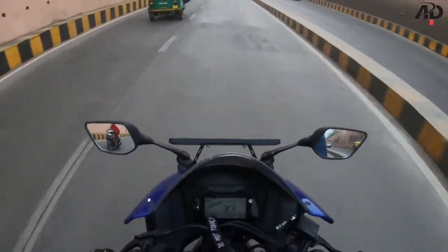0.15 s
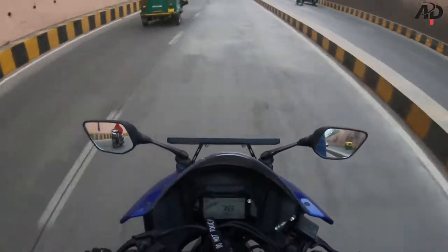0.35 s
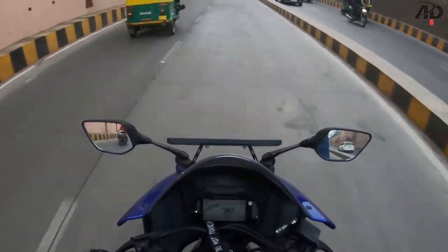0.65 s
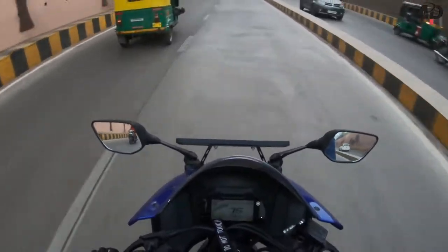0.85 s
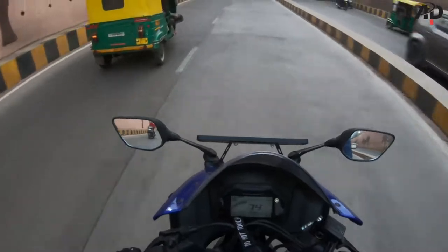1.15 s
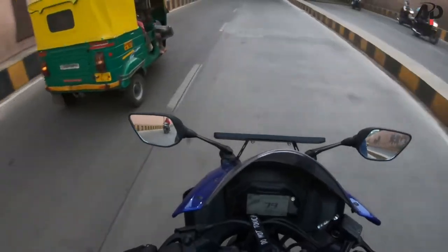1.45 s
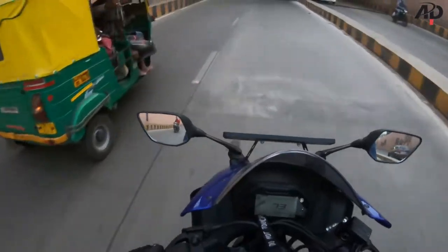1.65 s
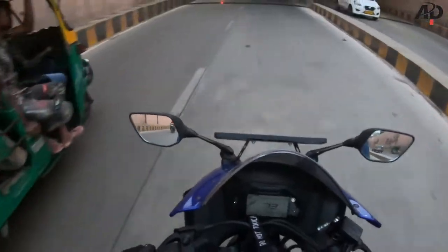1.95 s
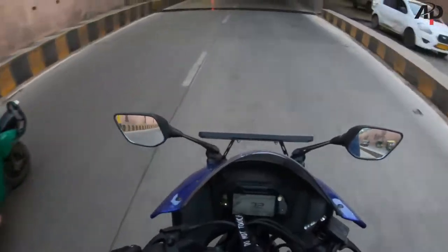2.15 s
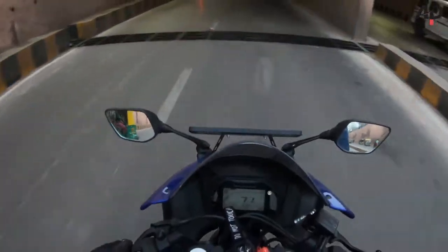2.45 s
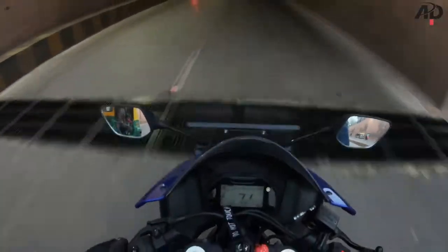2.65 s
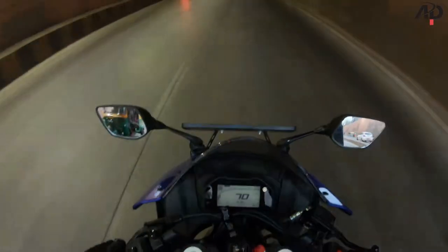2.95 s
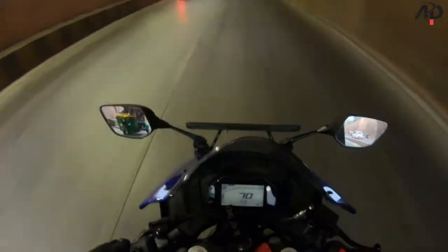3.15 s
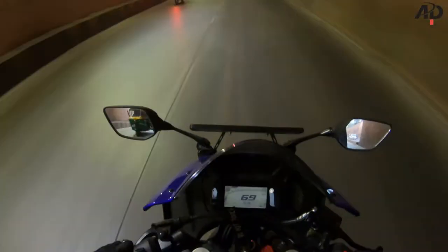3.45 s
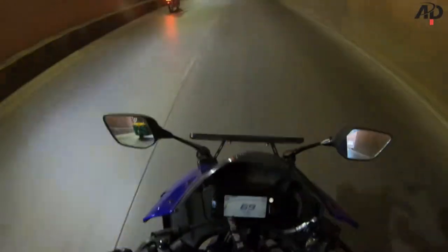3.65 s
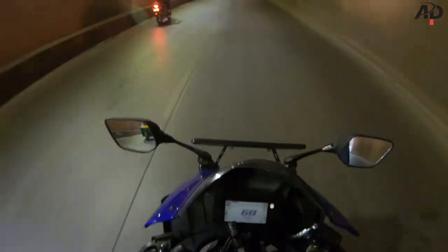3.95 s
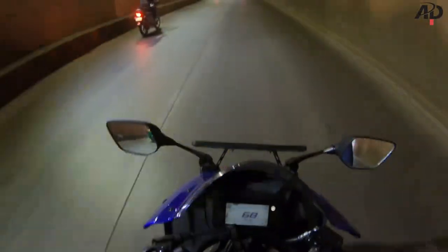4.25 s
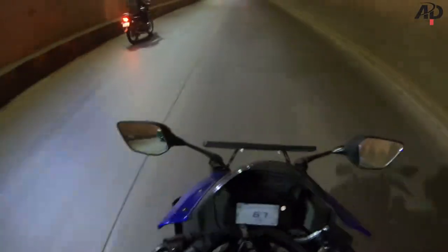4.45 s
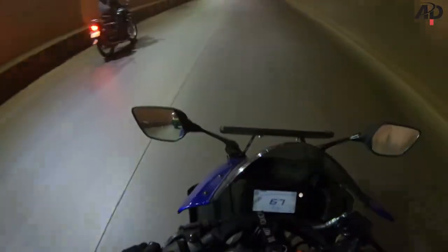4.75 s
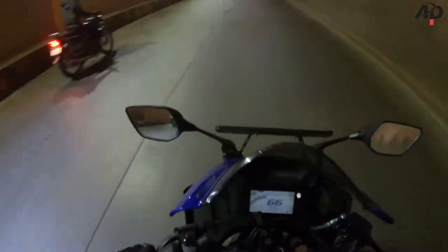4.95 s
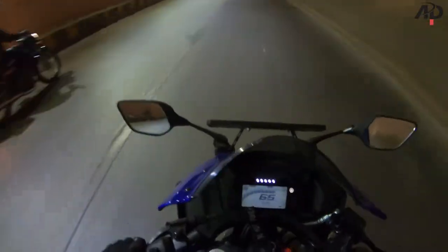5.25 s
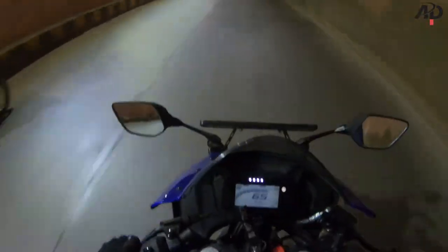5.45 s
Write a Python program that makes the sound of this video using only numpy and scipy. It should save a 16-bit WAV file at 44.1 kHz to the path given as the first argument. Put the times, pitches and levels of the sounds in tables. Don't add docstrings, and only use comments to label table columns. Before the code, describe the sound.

A single-cylinder sport motorcycle is heard from a microphone at the rider's helmet, in the left channel only. Its low exhaust hum dips, blips up slightly, then sinks to slow faint thumps while coasting into an underpass. Low wind buffeting, road roar and tyre hiss dominate, with small ticks. Near the end the throttle opens and the note leaps up into a barking, raspy roar echoing off the walls.

```python
import sys
import numpy as np
from scipy import signal
from scipy.io import wavfile
from scipy.ndimage import uniform_filter1d

SR = 44100
rng = np.random.default_rng(int(sys.argv[2]) if len(sys.argv) > 2 else 0)


def pcm_store(signal):
    levels = np.round(np.clip(np.atleast_2d(signal), -1, 1) * 32767)
    wavfile.write(sys.argv[1], SR, levels.astype(np.int16).T)


def to_linear_factor(level_db):
    exponent = np.asarray(level_db, float) / 20
    return 10 ** exponent


N = 246959
T = np.arange(N) / SR

# start_s, exhaust_db, throttle [0 shut, 1 open, slightly over at full pull]
LOAD_CURVE = [(0, -19, 0.2), (.74, -18.5, 0), (1.5, -18, 0.38), (1.86, -21, .09), (2.12, -22.5, 0.23),
              (2.36, -27, 0.48), (2.62, -47, 0.27), (3.6, -32, 0.53), (3.95, -30.5, 0.58),
              (4.3, -28.5, 0.53), (4.45, -21, 0.65), (4.62, -17, 0.54), (4.8, -18.5, 0.89),
              (4.95, -20, 1.02), (5.14, -14.5, 0.78), (5.25, -23.5, 1.05), (5.42, -23, 0.97),
              (5.6, -16.5, 0.83)]


def evened(x):
    return x / np.sqrt(np.mean(x ** 2) + 1e-20)


def read(points, hz):
    f, value = np.transpose(points)
    return np.interp(np.log(hz + 1), np.log(f + 1), value)


def curves(rows):
    s, *columns = np.transpose(rows)
    return [np.interp(T, s, column) for column in columns]


def coloured(x, points):
    hz = abs(np.fft.fftfreq(16384, 1 / SR))
    log_gain = np.log(to_linear_factor(read(points, hz)))
    response = np.exp(np.conj(signal.hilbert(log_gain)))
    taps = np.fft.ifft(response).real[:6000]
    return evened(signal.oaconvolve(x, taps)[:N])


def noise(points, size, patchy_db, flicker_db, lasting=7):
    frames, hz = 4 * N // size + 8, np.fft.rfftfreq(size, 1 / SR)
    a, b, patches = rng.standard_normal((frames, len(hz), 3)).T
    patches = uniform_filter1d(patches, size=9, axis=0)
    patches = evened(uniform_filter1d(patches, size=lasting, axis=1))
    flicker = evened(uniform_filter1d(rng.standard_normal(frames), size=5))
    level_db = read(points, hz)[:, None] + patchy_db * patches + flicker_db * flicker
    z = (a + 1j * b) * to_linear_factor(level_db)
    return evened(signal.istft(z, nperseg=size, noverlap=3 * size // 4)[1][:N])


def steadied(x, size):
    power = uniform_filter1d(uniform_filter1d(x ** 2, size=size), size=size)
    return x / np.sqrt(abs(power) + .1)


def crackle(rate_hz, cycles):
    # freq_hz, level_db
    crack_colour = [(900, -34.5), (1800, 11), (2600, 4.5), (3300, 2), (4200, -9.5), (6000, -20),
                    (12000, -37)]
    level_db, full_rate_hz, full_pull_hz_per_s, coasting_share = -41, 73, 100, .25
    pull = uniform_filter1d(np.gradient(rate_hz) * SR, size=2000) / full_pull_hz_per_s
    pull = np.clip(pull, coasting_share, 1)
    speed_gain = np.minimum(rate_hz / full_rate_hz, 1) ** 6
    spits = (.12 + np.exp(-(cycles % 1) / .14)) * rng.standard_normal(N)
    return to_linear_factor(level_db) * pull * speed_gain * coloured(spits, crack_colour)


def engine():
    # start_s, firing_rate_hz
    speed_curve = [(0, 47.2), (.27, 41), (.38, 39.4), (.66, 47.6), (.76, 49.4), (.92, 48.6), (1.08, 45.3),
                   (1.51, 35), (2.1, 23.2), (2.7, 12), (4.32, 12.5), (4.52, 16), (4.72, 29), (4.91, 47.5),
                   (5.13, 77), (5.2, 83.2), (5.27, 82.6), (5.6, 73.8)]
    # freq_hz, level_db
    boom_colour = [(30, -40), (55, -20), (75, -5.5), (90, -.5), (115, -.5), (140, -3), (160, -9),
                   (195, -10), (237, -17), (280, -26), (340, -17), (410, -24), (700, -42), (9000, -100)]
    # freq_hz, level_db
    thump_colour = [(30, -40), (55, -18), (75, -3), (90, 0), (110, -2.5), (150, -14), (200, -16),
                    (340, -21), (700, -42), (9000, -100)]
    # freq_hz, level_db
    bark_colour = [(50, -26.5), (80, -6), (120, -13), (200, -3.5), (250, -2), (290, -3), (330, 1),
                   (370, -2), (410, -5), (490, -6), (570, -14), (700, -19), (1200, -35), (12000, -100)]
    # freq_hz, level_db
    rasp_colour = [(300, -33.5), (700, -3), (950, 6.5), (1180, 10.5), (1500, 3), (2000, -6), (3500, -26.5),
                   (5000, -33), (15000, -57)]
    clear_firing_s = 4.797
    bark_shut_db, bark_open_db = -36, 1
    rasp_shut_db, rasp_open_db = -45.5, -31
    rasp_db_per_hz, rasp_from_hz, rasp_full_hz = 0.5318, 35, 61
    thump_below_hz, boom_above_hz = 28.5, 33.5
    rough_fast, rough_idle, rough_open, smooth_hz = .02, .4, .045, 16

    (rate_hz,), (boom_db, throttle) = curves(speed_curve), curves(LOAD_CURVE)
    bark_db = boom_db + bark_shut_db + (bark_open_db - bark_shut_db) * throttle
    rasp_db = boom_db + rasp_shut_db + (rasp_open_db - rasp_shut_db) * throttle
    rasp_db += rasp_db_per_hz * np.clip(rate_hz - rasp_from_hz, 0, rasp_full_hz - rasp_from_hz) * throttle
    rough = rough_fast + rough_open * throttle + rough_idle / (1 + (rate_hz / smooth_hz) ** 8)

    cycles = np.cumsum(rate_hz) / SR
    cycles = cycles - cycles[round(clear_firing_s * SR) - 60]
    at = np.flatnonzero(np.diff(np.floor(cycles)))
    chance = rng.standard_normal((400, 2))[:len(at)]
    jitter = 0.05 * rough[at] * chance[:, 0] * SR / rate_hz[at]
    at = np.clip(at + jitter.astype(int), 0, N - 1)
    firings = np.zeros(N)
    firings[at] = -to_linear_factor(10.0 * rough[at] * chance[:, 1]) / np.sqrt(rate_hz[at])
    puffs = (.3 + 1.5 * np.exp(-(cycles % 1) / .25)) * rng.standard_normal(N)

    share = np.clip(rough, 0, 1)
    fast = np.clip((rate_hz - thump_below_hz) / (boom_above_hz - thump_below_hz), 0, 1)
    rings = fast * coloured(firings, boom_colour) + (1 - fast) * coloured(firings, thump_colour)
    boom = (1 - share) * rings + 0.74 * share * coloured(puffs, boom_colour)
    bark = (1 - share) * coloured(firings, bark_colour) + 0.64 * share * coloured(puffs, bark_colour)
    rasp = 0.88 * coloured(firings, rasp_colour) + 1.11 * coloured(puffs, rasp_colour)
    exhaust = to_linear_factor(boom_db) * boom + to_linear_factor(bark_db) * bark + to_linear_factor(rasp_db) * rasp
    return exhaust + crackle(rate_hz, cycles)


def underpass(x):
    # freq_hz, t60_s
    wall_decay = [(80, 0.36), (400, 2), (1500, 0.71), (5000, 0.22)]
    entry_s, entry_length_s = 2.6, .4
    cutting_db, tunnel_db = -21, -13
    taps = np.zeros(SR)
    at = np.arange(900, SR - 20, 20) + rng.integers(0, 20, (SR - 901) // 20)
    taps[at] = rng.choice([-1., 1.], len(at))
    hz, t, z = signal.stft(taps, SR, nperseg=512)
    decay = to_linear_factor(-60 * t / read(wall_decay, hz)[:, None])
    tail = signal.istft(z * decay, SR, nperseg=512)[1]
    inside = np.clip((T - entry_s) / entry_length_s + .5, 0, 1)
    echoes = signal.fftconvolve(x, tail / np.linalg.norm(tail))[:N]
    return to_linear_factor(cutting_db + (tunnel_db - cutting_db) * inside) * echoes


def air():
    # start_s, wind_db,
    # road_db
    ride_curve = [(0, -25, 0), (.7, -23, -2.5), (1.45, -24, -2), (1.7, -23.5, 0), (2.3, -19.5, 0),
                  (2.62, -19.5, -1.5), (3.1, -17, 0.5), (3.8, -20.5, 1.5), (4.2, -18.5, 2), (4.62, -23, 3),
                  (4.98, -24, -4), (5.3, -30.5, 1.5), (5.6, -23, -2)]
    # centre_s, lift_db, length_s
    gust_events = [(.22, 1.5, .06), (0.632, 3.5, 0.054), (0.867, 3.5, .08), (1.22, 2, 0.14), (1.55, 2, .05),
                   (2.025, 0, 0.24), (2.437, 4.5, 0.093), (2.543, 1.5, 0.058), (2.578, -0.5, 0.014),
                   (2.71, 2.5, 0.019), (2.794, 4, 0.034), (2.983, 2, 0.068), (3.312, 1.5, 0.042),
                   (4.033, 1, .04), (4.139, 3, 0.049), (5.148, 1.5, 0.042)]
    # freq_hz, level_db
    buffet_colour = [(1, 6), (3, 11.5), (6, 15.5), (10, -3.5), (15, 4.5), (20, -13), (40, -61), (200, -120)]
    # freq_hz, level_db
    flutter_colour = [(8, -46), (17, 11), (28, 3.5), (40, -1), (55, -5), (90, -6.5), (200, -49),
                      (1500, -100)]
    # freq_hz, density_db_per_hz
    roar_colour = [(30, -41), (60, -14), (90, 1.5), (115, -11), (140, -11), (215, -9.5), (250, -13),
                   (285, -9.5), (325, -13.5), (500, -17.5), (1000, -28), (1300, -29), (1700, -41),
                   (4000, -120)]
    # freq_hz, density_db_per_hz
    tyre_colour = [(900, -4.5), (1500, -5.5), (1700, -2.5), (2200, 2.5), (2500, 1), (3200, -5), (4300, -15),
                   (6500, -41.5), (11000, -110)]
    # freq_hz, density_db_per_hz
    hiss_colour = [(2500, -21), (4500, -1), (6000, -4), (8000, -7), (10000, -10), (13000, -11),
                   (14800, -14), (15800, -12)]

    wind_db, road_db = curves(ride_curve)
    throttle = curves(LOAD_CURVE)[1]
    gust_db = sum(db * np.exp(-((T - s) / length_s) ** 2) for s, db, length_s in gust_events)
    buffet_db = wind_db + 0.91 * gust_db
    roar_db = -35 + 0.69 * road_db + 0.89 * gust_db + 6.5 * throttle ** 2
    tyre_db = -44.5 + road_db + gust_db
    hiss_db = -57 + 0.73 * road_db + gust_db

    lumps = noise(buffet_colour, size=16384, patchy_db=-7, flicker_db=-2.5)
    lumps = lumps - uniform_filter1d(lumps, size=30000)
    eddies = noise(flutter_colour, size=8192, patchy_db=-3.0, flicker_db=-6.5)
    out = to_linear_factor(buffet_db) * (steadied(lumps, size=6000) + to_linear_factor(-5.5) * steadied(eddies, size=3000))
    out += to_linear_factor(roar_db + 7.0) * noise(roar_colour, size=2048, patchy_db=1.0, flicker_db=-0.34)
    out += to_linear_factor(tyre_db - 2.12) * noise(tyre_colour, size=512, patchy_db=1.0, flicker_db=0.88)
    hiss = noise(hiss_colour, size=256, patchy_db=1.04, flicker_db=0.67, lasting=40)
    return out + to_linear_factor(hiss_db - 2.0) * hiss


def ticks():
    # start_s, peak_db, centre_hz, width [share of centre], t60_s
    knocks = [(.2, -50, 6000, .5, .03), (.849, -51, 7000, .5, .03), (.905, -48, 7500, .4, .05),
              (1.659, -40.5, 8000, .7, .045), (1.661, -41, 4200, .45, .04), (1.888, -50, 6000, .3, .03),
              (2.241, -51, 10000, .3, .02), (2.498, -49, 11000, .4, .06), (2.513, -48, 4800, .08, .03),
              (2.563, -51, 12400, .2, .02), (2.7, -48, 12620, .05, .03), (2.701, -47, 8000, .6, .015),
              (2.947, -51, 11100, .3, .08), (3.279, -51, 9000, .5, .04), (4.968, -50, 6000, .5, .014),
              (5.548, -48, 6000, .5, .015)]
    out, t = np.zeros(N + 4000), np.arange(4000) / SR
    for s, peak_db, hz, width, t60_s in knocks:
        onset = np.minimum(t / .004, 1) ** 2
        burst = rng.standard_normal(len(t)) * to_linear_factor(-60 * t / t60_s) * onset
        edges_hz = hz * (1 + np.clip(width, .03, .9) * np.array([-1, 1]))
        b, a = signal.butter(2, np.minimum(edges_hz, .45 * SR), "band", fs=SR)
        burst = signal.lfilter(b, a, burst)
        out[round(s * SR):][:len(t)] += to_linear_factor(peak_db) * burst / abs(burst).max()
    return out[:N]


def vents():
    # freq_hz, density_db_per_hz
    fizz_colour = [(6000, -30), (8500, -3), (11000, -3), (14500, -10), (15800, -13)]
    # centre_s, level_db, length_s
    swell_events = [
        (2.013, -63, 0.069),
        (2.522, -60, .03),
        (2.985, -59, .045),
        (3.29, -66, .03),
        (4.144, -66, 0.057),
        (4.5, -65.5, 0.13),
    ]
    swell = sum(to_linear_factor(db) * np.exp(-((T - s) / length_s) ** 2) for s, db, length_s in swell_events)
    return swell * noise(fizz_colour, size=256, patchy_db=1.5, flicker_db=.8)


def scene():
    exhaust = engine()
    capsule = 2 * (exhaust + underpass(exhaust) + air() + ticks() + vents())
    return np.array([capsule, np.zeros(N)])


def roll_off(x):
    return signal.sosfilt(signal.butter(12, 15760, fs=SR, output="sos"), x)


def record(dry):
    knee = 1.8
    rounded = np.clip(knee * np.tanh(dry / knee), -1, 1)
    return roll_off(rounded)


dry = scene()
out = record(dry)
pcm_store(out)
```